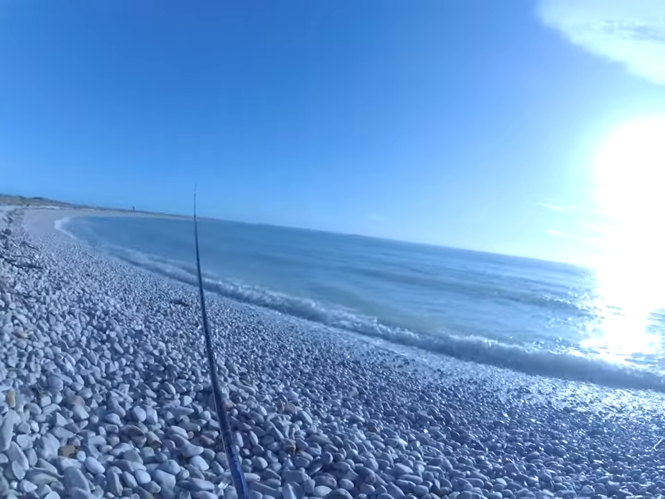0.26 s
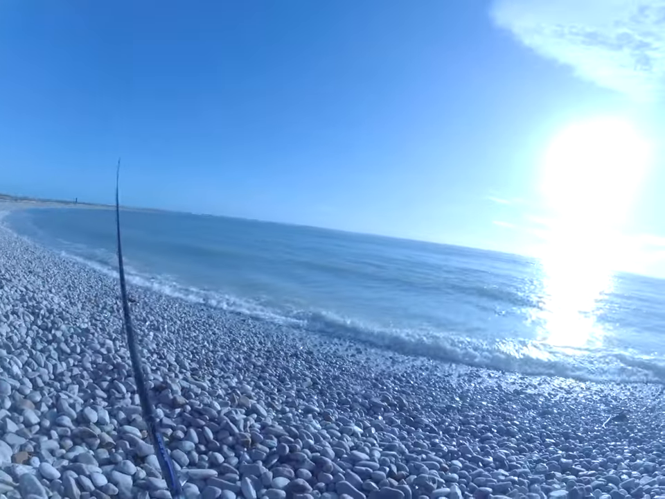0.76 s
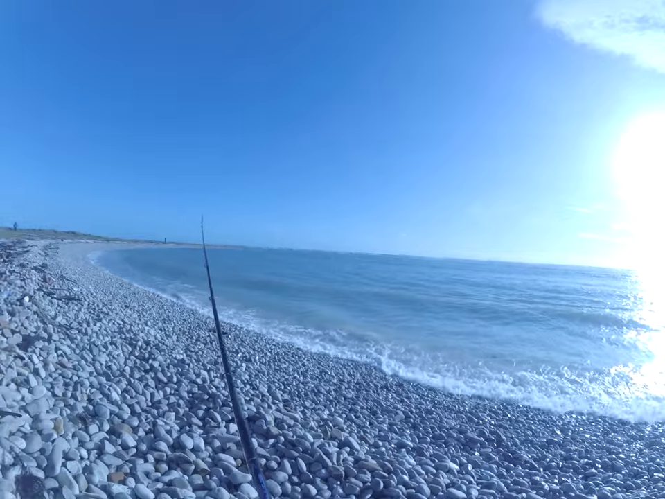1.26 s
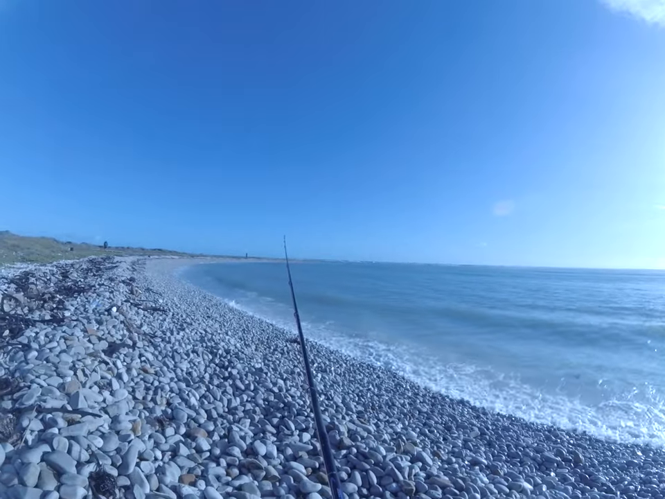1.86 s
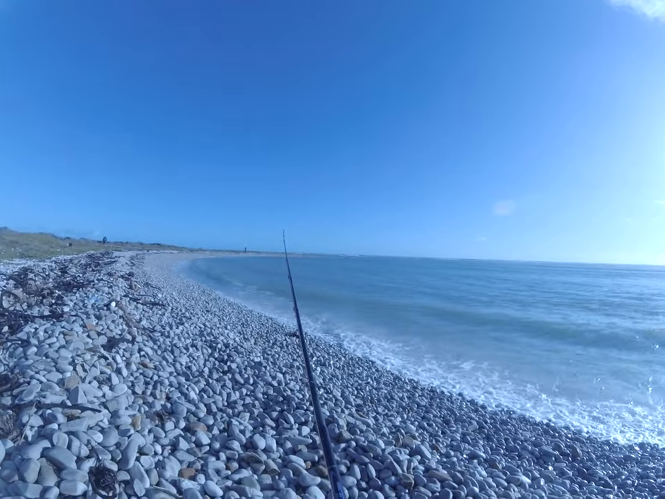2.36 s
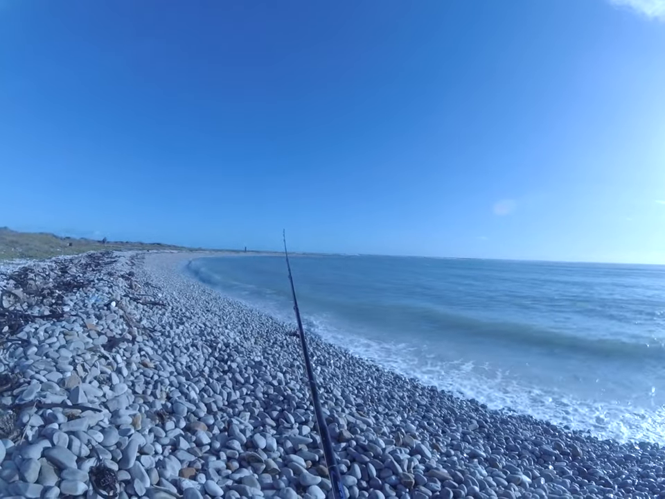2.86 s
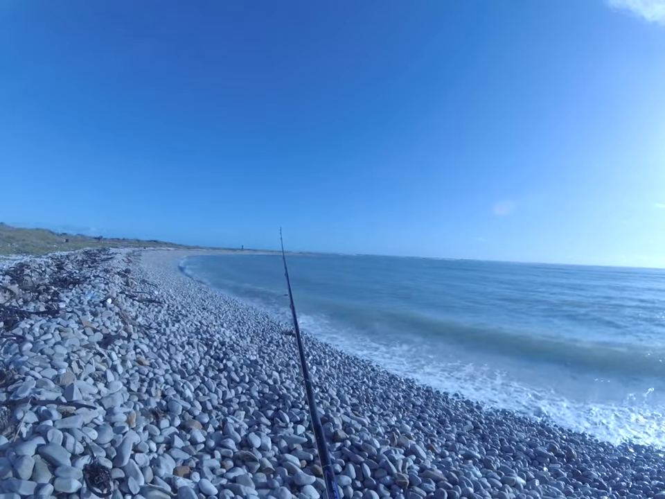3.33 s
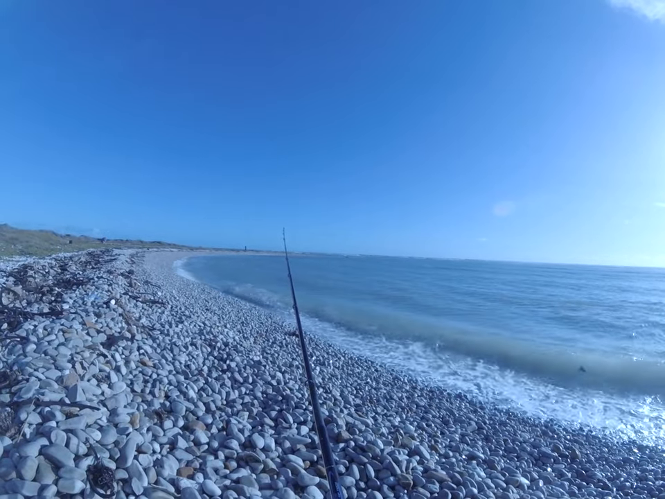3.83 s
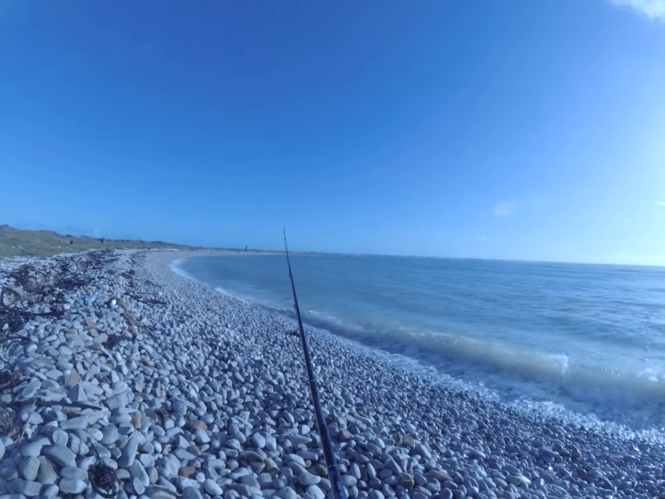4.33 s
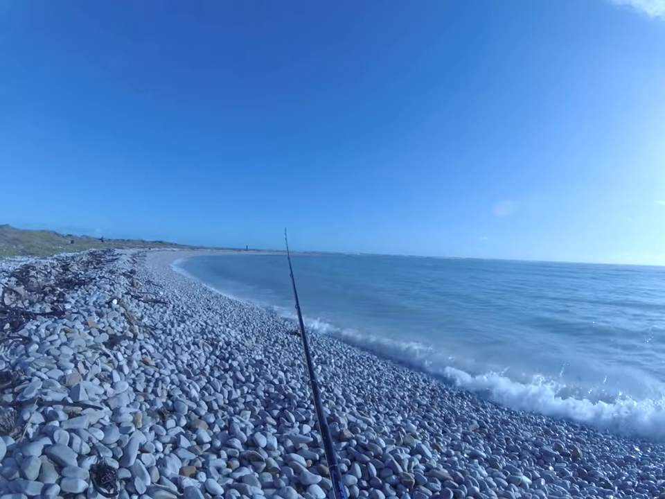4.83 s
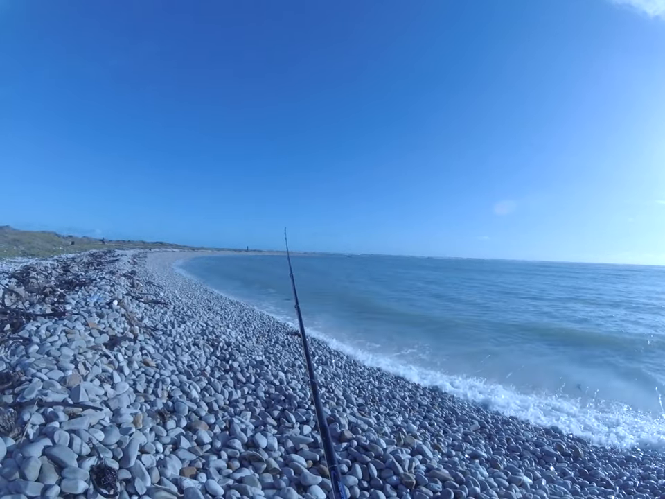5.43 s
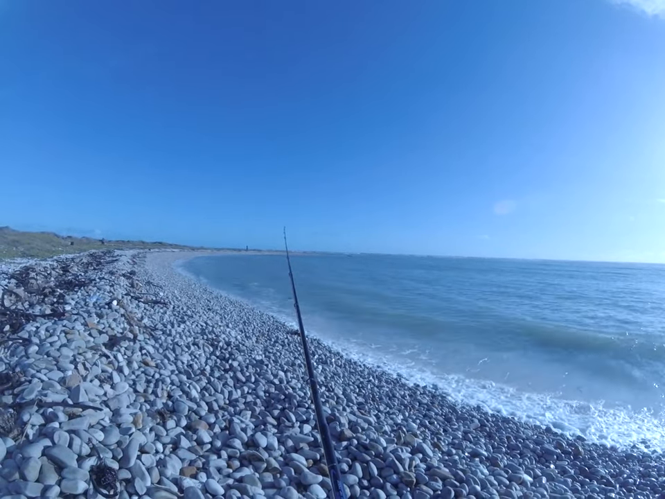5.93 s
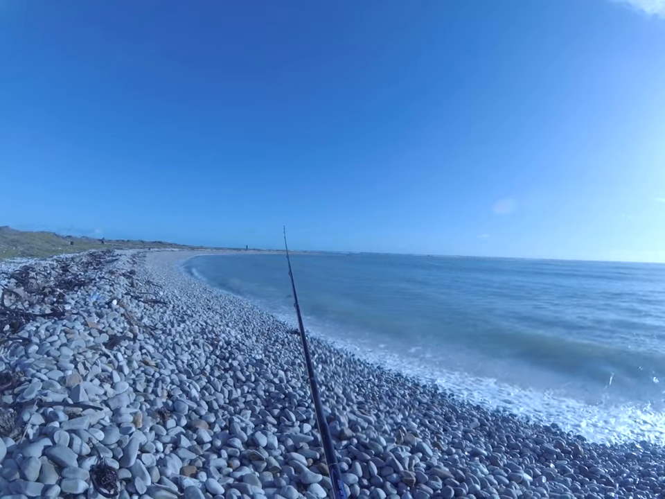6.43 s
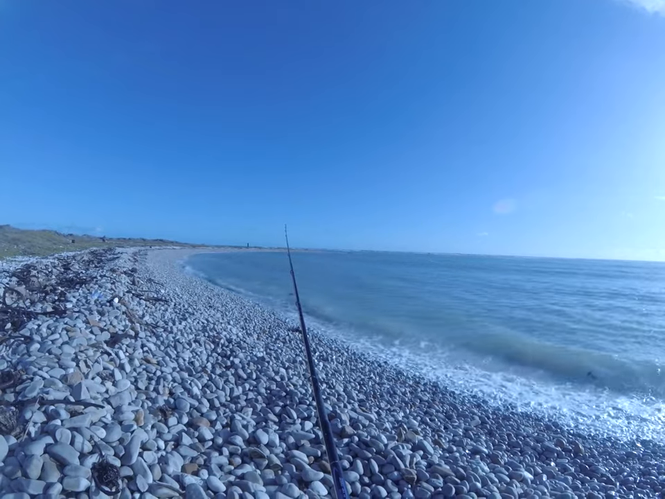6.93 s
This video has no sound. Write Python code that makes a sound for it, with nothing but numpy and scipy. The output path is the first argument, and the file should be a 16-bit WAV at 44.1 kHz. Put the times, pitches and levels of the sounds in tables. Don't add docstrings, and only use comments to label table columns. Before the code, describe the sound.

Gusty wind rumbles over a microphone as two waves wash a stony shore, then backwash clatters the pebbles together close by.

```python
import sys
import numpy as np
from scipy import signal
from scipy.fft import rfft, irfft, dct, next_fast_len
from scipy.io import wavfile
from scipy.ndimage import uniform_filter1d

SR = 44100
rng = np.random.default_rng(int(sys.argv[2]) if len(sys.argv) > 2 else 0)


def output_pcm(signal):
    pcm = np.clip(np.atleast_2d(signal).T, -1, 1) * 32767
    wavfile.write(sys.argv[1], SR, np.round(pcm).astype(np.int16))


def convert_level_to_amplitude(level_db):
    exponent = np.asarray(level_db, float) / 20
    return 10 ** exponent


N = 317079


def rms_one(x):
    return x / np.sqrt(np.mean(x ** 2) + 1e-20)


def both(a_db, b_db):
    return 10 * np.log10(convert_level_to_amplitude(a_db) ** 2 + convert_level_to_amplitude(b_db) ** 2)


def in_time(rows):
    s, *columns = np.transpose(rows)
    return [np.interp(np.arange(N) / SR, s, c) for c in columns]


def bumps(rows):
    t = np.arange(0, N + 32, 32) / SR
    return np.array([np.cos(np.pi / 2 * np.clip((t - row[0]) / row[1], -1, 1)) ** 2 for row in rows])


def fine(coarse):
    return np.interp(np.arange(N) / 32, np.arange(len(coarse)), coarse)


def drift(rate):
    r = np.exp(-80 * np.pi * rate / SR)
    noise = rng.standard_normal(N // 40 + 2002)
    slow = signal.lfilter([1], [1, -2 * r, r * r], noise)[2000:]
    return np.interp(np.arange(N) / 40, np.arange(len(slow)), rms_one(slow))


def ring(clicks, hz, t60):
    r = np.exp(-np.log(1000) / (t60 * SR))
    w = 2 * np.pi * hz / SR
    return signal.lfilter([0, np.sin(w)], [1, -2 * r * np.cos(w), r * r], clicks + 1e-18)


def patchy(source, spectrum, shared_db, own_db, rate, count):
    size = next_fast_len(N)
    hz = np.maximum(np.fft.rfftfreq(size, 1 / SR), 1)
    corner_hz, level_db = np.transpose(spectrum)
    gain_db = np.interp(np.log(hz), np.log(corner_hz), level_db, left=-200, right=-200)
    coloured = rfft(source, size) * convert_level_to_amplitude(gain_db)
    place = np.log(hz / corner_hz[1]) / np.log(corner_hz[-2] / corner_hz[1])
    place = np.clip(place, 0, 1) * (count - 1)
    out = 0
    for k in range(count):
        band = irfft(coloured * np.maximum(1 - abs(place - k), 0), size)[:N]
        out = out + band * convert_level_to_amplitude(shared_db + own_db * drift(rate))
    return rms_one(out)


def evened(x, over_s, depth):
    width = round(over_s * SR)
    level = uniform_filter1d(uniform_filter1d(x ** 2, width), width)
    return rms_one(x / (level + 1e-3) ** (depth / 2))


def hiss():
    # (time [s], level [dB])
    hiss_level = [(0.0, -94), (0.18, -88), (0.75, -75), (1.98, -71.5), (4.48, -67), (4.91, -68.5),
                  (5.25, -66), (6.11, -67.5), (7.19, -66)]
    # (frequency [Hz], density [dB per Hz])
    hiss_colour = [(6760, -34), (11500, -5), (13100, -6), (14000, -10), (14400, -18)]
    noise = patchy(rng.standard_normal(N), hiss_colour, 0, 0, rate=3, count=1)
    return convert_level_to_amplitude(in_time(hiss_level)[0] + 3.0) * noise


def wind():
    # (time [s], level [dB])
    mean_wind = [(0.0, -27.5), (0.2, -31.5), (0.5, -27), (1.24, -33), (1.6, -29), (2.3, -24.5), (2.9, -25),
                 (3.15, -21.5), (3.6, -18), (4.3, -23.5), (4.65, -20.5), (5.0, -27), (5.6, -26.5),
                 (6.0, -29.5), (6.45, -20.5), (6.8, -17), (7.19, -27.5)]
    # (time [s], half length [s], rumble rise [dB], flutter rise [dB])
    gusts = [(0.26, 0.061, -3, 5.5), (0.5, 0.061, -2, 6.5), (0.361, 0.052, 5.5, 9), (0.63, 0.056, 5.5, 3.5),
             (0.982, 0.18, 4, -0.5), (1.43, .04, 13, 3), (1.609, 0.16, 10, 9.5), (1.78, 0.028, 13.5, 2),
             (2.175, 0.055, 5, 1), (2.757, 0.16, -5, -3.5), (2.38, 0.066, 0, 2), (3.045, 0.048, -1.5, 4),
             (3.254, 0.032, 12.5, 6.5), (3.45, 0.033, -9, 4.5), (3.53, 0.024, 3, 3), (3.97, 0.2, 4, 5),
             (4.202, 0.061, -1, 6), (4.408, 0.061, 4.5, 8), (4.559, 0.08, 0, 11), (4.78, 0.072, -1, 6),
             (4.978, 0.053, 11, 10.5), (5.07, 0.059, 4, 11), (5.197, 0.059, 10.5, 12), (5.33, 0.044, 7, 0),
             (5.731, 0.063, 11, 7), (6.167, 0.26, 6.5, 2.5), (6.56, 0.056, 3, 5), (6.7, 0.09, -1, 6),
             (6.938, 0.043, -16, 11.5), (7.124, 0.062, 7.5, 2)]
    # (time [s], half length [s], rumble change [dB], flutter change [dB])
    lulls = [(0.16, 0.09, -3, -4), (0.41, 0.035, -1, -4), (0.7, 0.057, -6, -6), (1.24, 0.087, -2, 1),
             (1.49, 0.043, -9, -8), (1.94, 0.035, 0, -5), (2.3, 0.072, -7, -8), (2.56, 0.029, -3, -13),
             (2.86, .05, -4, 1), (2.96, 0.051, -8, -3), (3.39, 0.026, -3.5, -12), (3.74, 0.051, -17, -6),
             (3.94, 0.034, -12, -25), (4.14, .05, -6, 5.5), (4.5, 0.033, -7, -4), (4.92, 0.048, -5, 4),
             (5.8, 0.046, -1, -5), (5.95, 0.14, -1, 0), (6.33, 0.089, -4.5, -5), (6.75, 0.047, -7, -18)]
    # (frequency [Hz], density [dB per Hz])
    rumble_colour = [(8.8, -52), (15, -7), (48, 2), (65, 4), (90, -5), (120, -11.5), (200, -120)]
    flutter_colour = [(53, -66), (90, 0), (172, -8.5), (240, -13.5), (310, -18.5), (530, -120)]
    # (time [s], peak [dB], pitch [Hz])
    buffets = [(1.413, -12, 83), (1.57, -25, 99.6), (1.763, -42, 72.7), (3.229, 0.5, 77), (3.538, 3, 106),
               (3.683, 1, 90.5), (3.955, -5, 120.1), (4.528, 1.5, 57.7), (4.958, -0.5, 50.4),
               (5.164, 1, 48.6), (5.709, -1, 85.6), (6.515, 1.5, 53.7), (6.65, -0.5, 55.4),
               (6.699, -4.5, 83), (6.759, -1, 106), (6.87, -5, 51.7), (6.933, -1, 148), (7.071, 0, 80)]

    swings = list(gusts) + list(lulls)
    rumble_rise, flutter_rise = np.transpose(swings)[2:] @ bumps(swings)
    mean_db = in_time(mean_wind)[0]
    rumble_db = mean_db + fine(rumble_rise)
    flutter_db = -25.5 + 0.74 * (mean_db + 25) + fine(flutter_rise)
    lumps = drift(28)
    rumble = patchy(rng.standard_normal(N), rumble_colour, 5.3 * lumps, own_db=2.0, rate=7.9, count=2)
    flutter = patchy(rng.standard_normal(N), flutter_colour, 0.72 * lumps, own_db=-1.0, rate=33, count=2)
    out = convert_level_to_amplitude(rumble_db + 2.76) * evened(rumble, 0.049, 0.99)
    out += convert_level_to_amplitude(flutter_db - 1.3) * evened(flutter, 0.054, 0.87)
    for s, peak_db, hz in buffets:
        t = np.arange(round(2.5 * SR / hz)) / SR * hz
        push = convert_level_to_amplitude(peak_db - 3.0) * np.sin(2 * np.pi * t) * (t / 0.72) * np.exp(1 - t / 0.52)
        at = round(s * SR)
        out[at:at + len(t)] += push[:N - at]
    return out


def ticks():
    # (time [s], peak [dB])
    grain_hits = [
        (3.0503, -25),
        (3.056, -33),
        (6.2494, -31),
        (3.326, -35),
        (3.397, -34),
        (6.143, -39),
        (6.213, -35),
        (6.798, -34),
    ]
    clicks = np.zeros(N)
    for s, peak_db in grain_hits:
        clicks[round(s * SR)] = convert_level_to_amplitude(peak_db)
    bright = 1.2 * ring(clicks, 6000, .004) - 1.1 * ring(clicks, 9000, .0015)
    return signal.sosfilt(signal.butter(4, [4600, 11300], "band", fs=SR, output="sos"), bright)


def rattle(level_db):
    # (time [s], rate [clicks per s])
    click_rate = [(6.35, 0), (6.6, 60), (6.8, 450), (7.19, 900)]
    born = rng.random(N) < in_time(click_rate)[0] / SR
    clicks = born * convert_level_to_amplitude(3.5 * np.minimum(rng.exponential(1, N), 3)) * rng.choice([-1, 1], N)
    modes = 0.84 * ring(clicks, 1110, 0.0084) - 0.9 * ring(clicks, 1840, 0.0042)
    return convert_level_to_amplitude(level_db) * (modes + 0.54 * ring(clicks, 3070, 0.0022))


def pebbles():
    # (time [s], peak [dB], ring [Hz], crack [dB])
    knocks = [(5.515, -7.5, 690, -32), (6.435, -30, 1310, -44), (6.486, -16, 830, -34),
              (6.533, -9.5, 1010, -38), (6.56, -9, 910, -31), (6.632, -14, 710, -43), (6.65, -4, 920, -45),
              (6.694, -14, 850, -52), (6.757, -12, 800, -29), (6.774, -7, 900, -34),
              (6.799, -7.5, 850, -21), (6.829, -15, 700, -16), (6.845, -9, 910, -19),
              (6.885, -27, 800, -27), (6.909, -27, 784, -43), (6.923, -31, 506, -17),
              (6.936, -11, 520, -25), (6.982, -10, 1050, -22), (7.027, -7, 1090, -24),
              (7.054, -7, 829, -31), (7.074, -13, 517, -23), (7.121, -5, 850, -15), (7.158, -10, 970, -38),
              (6.506, -20, 1000, -42), (6.637, -11, 970, -32), (6.67, -12, 910, -36),
              (6.701, -16, 1220, -32), (6.818, -16, 690, -36), (6.841, -10, 800, -36),
              (6.871, -18, 1000, -35), (6.911, -17, 1670, -27), (6.962, -18, 890, -32),
              (7.031, -11, 950, -28), (7.059, -17, 790, -26), (7.078, -8, 990, -30), (7.128, -8, 1040, -30),
              (7.17, -13, 910, -32), (3.326, -31, 2900, -34), (3.436, -22, 900, -29),
              (3.52, -17, 1200, -36), (3.617, -22, 2220, -36), (3.876, -15, 990, -32),
              (3.891, -10, 970, -28), (4.089, -15, 1300, -32), (4.224, -12, 1110, -32),
              (6.765, -11, 490, -35), (6.81, -15, 526, -40), (6.833, -9, 540, -40), (6.851, -13, 503, -34)]
    out, t = np.zeros(N), np.arange(round(.08 * SR)) / SR
    chance = rng.standard_normal((len(knocks), len(t)))
    crack_band = signal.butter(1, [600, 2000], "band", fs=SR, output="sos")
    for (s, peak_db, hz, crack_db), noise in zip(knocks, chance):
        body = np.sin(2 * np.pi * hz * t) * np.exp(-t / 0.005)
        body += .5 * np.sin(2 * np.pi * 1.127 * hz * t) * np.exp(-t / 0.0038)
        crack = signal.sosfilt(crack_band, 2.5 * (t == 0) + noise * np.exp(-t / .0035))
        knock = convert_level_to_amplitude(peak_db - 7.5) * body + convert_level_to_amplitude(crack_db + 10.0) * crack
        at = round(s * SR)
        out[at:at + len(t)] += knock[:N - at]
    return signal.sosfilt(signal.butter(4, 3200, fs=SR, output="sos"), out)


def hollow():
    # (time [s], half length [s], level [dB], pitch [Hz])
    tubes = [
        (0.88, 0.097, -36, 800),
        (1.085, 0.081, -27, 424),
        (1.19, .12, -35, 860),
        (1.55, .25, -36.5, 820),
        (4.825, 0.072, -26, 416),
        (5.185, .1, -26, 440),
        (5.38, 0.15, -21, 440),
        (5.46, 0.069, -26, 547),
    ]
    t60 = 0.022
    noise = rng.standard_normal(N)
    out = np.zeros(N)
    for (_, _, level_db, hz), hump in zip(tubes, bumps(tubes)):
        hum = rms_one(ring(ring(noise, hz, t60), hz, t60))
        out += convert_level_to_amplitude(level_db) * fine(hump) * hum
    return out


def bubbles(low_hz, high_hz, per_s, cycles, spread_db, clumps):
    sizes = convert_level_to_amplitude(spread_db * np.minimum(rng.exponential(1, N), 5)) * rng.choice([-1, 1], N)
    born = rng.random(N) < per_s * convert_level_to_amplitude(clumps) / SR
    dealt = rng.integers(0, 11, N)
    out = np.zeros(N)
    for k, hz in enumerate(np.geomspace(low_hz, high_hz, num=11)):
        out += ring(sizes * born * (dealt == k), hz, cycles / hz) * np.sqrt(hz)
    return rms_one(out)


def water(level_db, spectrum, grains, share, surge_db, own_db):
    share = np.clip(share, 0, 1)
    mix = np.sqrt(1 - share ** 2) * rng.standard_normal(N) + share * grains
    coloured = patchy(mix, spectrum, surge_db, own_db, rate=13.0, count=3)
    return convert_level_to_amplitude(level_db) * evened(coloured, 0.044, 0.44)


def slapped(hz):
    # (time [s], half length [s], rise [dB], bubble pitch [Hz])
    slaps = [(0.766, 0.066, 1, 550), (0.817, 0.17, 2.5, 1400), (0.91, 0.024, 5.5, 900),
             (1.135, 0.12, 1.5, 1600), (1.19, 0.19, 2, 800), (3.058, .03, 9, 4000), (1.75, 0.54, 6, 11000),
             (3.403, .1, -4.5, 2200), (3.564, 0.12, -1, 11000), (3.566, 0.068, 2.5, 1800),
             (3.713, 0.061, 2, 3950), (3.837, .05, -3, 3000), (3.895, 0.049, 6, 2000),
             (3.398, .05, 2.5, 7000), (0.148, 0.33, 2, 2500), (4.427, 0.037, 3.5, 350),
             (4.807, 0.15, 4, 11000), (4.795, 0.1, 5, 2540), (4.974, 0.043, 3.5, 500),
             (5.015, 0.018, -5, 400), (5.172, 0.11, 1.5, 400), (5.206, 0.24, 2, 6000),
             (5.368, 0.03, 4.5, 900), (5.42, 0.05, 1.5, 297), (5.555, 0.3, 4.5, 12000),
             (5.724, 0.15, 4.5, 7000), (5.824, 0.029, 3.5, 350), (6.242, 0.038, 3, 4930),
             (3.672, 0.23, 4, 1400), (6.372, 0.06, 2, 1810), (7.076, 0.095, 3, 2500),
             (6.925, .04, -12, 300)]
    _, _, rise_db, pitch = np.transpose(slaps)
    reach_octaves = 1.14
    nearness = np.exp(-(np.log2(pitch / hz) / reach_octaves) ** 2)
    return fine(rise_db * nearness @ bumps(slaps))


def surf_levels():
    # (time [s], level [dB])
    foam_level = [(0.0, -47.5), (0.53, -34.5), (0.84, -30), (1.0, -30.5), (1.2, -28), (1.75, -39.5),
                  (2.31, -43), (3.0, -50), (3.33, -44.5), (3.57, -30.5), (4.1, -29.5), (4.45, -26),
                  (4.8, -26), (5.3, -26), (5.55, -36), (5.9, -44), (6.6, -44), (7.19, -36.5)]
    # (time [s], level [dB])
    tumble_level = [(0.0, -43.5), (0.5, -35.5), (0.8, -30.5), (1.2, -30), (1.75, -30.5), (2.4, -36.5),
                    (3.2, -43.5), (3.48, -39), (3.57, -32), (4.3, -27), (4.8, -22), (5.4, -23.5),
                    (5.6, -26.5), (6.0, -33), (6.45, -36), (7.19, -33.5)]
    # (start [s], rise time [s], roar [dB], splash [dB])
    start, rise, back_roar_db, back_splash_db = (6, 1.3, -29.5, -32)

    t = np.arange(N) / SR
    foam = in_time(foam_level)[0] + 30
    tumble = in_time(tumble_level)[0] + 30
    back_db = 20 * np.log10(np.clip((t - start) / rise, 1e-3, 1) ** 1.2)
    pocket_db = -29 + 0.88 * tumble
    roar_db = both(-29.5 + 0.62 * tumble + 0.14 * foam, back_roar_db + back_db)
    splash_db = both(-33 + 0.13 * tumble + 0.63 * foam, back_splash_db + 1.6 * back_db)
    fizz_db = foam - 30
    spray_db = both(-45 + 1.37 * foam, -56.5) - 21.5 * np.exp(-t / 0.49)
    return (pocket_db + slapped(hz=350), roar_db + slapped(hz=800), splash_db + slapped(hz=2000),
            fizz_db + slapped(hz=6000), spray_db + slapped(hz=9000))


def surf():
    # (frequency [Hz], density [dB per Hz])
    pocket_colour = [(140, 5.5), (240, -1.5), (362, -2), (409, -2.5), (600, -3.5), (780, -29), (1320, -120)]
    roar_colour = [(350, -7.5), (600, -5.5), (855, -5.5), (1400, -11), (1820, -40), (3080, -120)]
    splash_colour = [(820, -36), (1400, -1), (3130, -8.5), (3750, -11.5), (4350, -20.5), (5720, -10),
                     (9680, -120)]
    fizz_colour = [(2590, -5.5), (4350, -10), (4800, -5), (5190, -0.5), (6100, 2), (6650, -1.5),
                   (7300, -10), (8500, -17.5), (11000, -42), (18700, -120)]
    spray_colour = [(5000, -17.5), (8500, -0.5), (10900, -9.5), (11500, -15.5), (15000, -61), (22000, -120)]

    surge = 0.33 * drift(7.6) + 0.76 * drift(30)
    pocket_db, roar_db, splash_db, fizz_db, spray_db = surf_levels()
    pockets = bubbles(264.0, 542, per_s=300, cycles=6.9, spread_db=1.5, clumps=.5 * surge)
    roar = bubbles(637, 1276, per_s=900, cycles=9.9, spread_db=1.0, clumps=0.73 * surge)
    splash = bubbles(1640, 3230, per_s=2500, cycles=7.9, spread_db=0.5, clumps=0.84 * surge)
    fizz = bubbles(3600, 11500, per_s=8000, cycles=5.5, spread_db=2.5, clumps=0.92 * surge)
    return (water(pocket_db, pocket_colour, pockets, 0.3, 0.12 * surge, own_db=-0.3)
            + water(roar_db - .4, roar_colour, roar, 0.22, 0.17 * surge, own_db=0.7)
            + water(splash_db - .3, splash_colour, splash, 0.41, 0.41 * surge, own_db=0.25)
            + water(fizz_db, fizz_colour, fizz, 0.54, 0.31 * surge, own_db=0.55)
            + water(spray_db, spray_colour, fizz, .35, .6 * surge, own_db=.8))


def scene():
    mono = wind() + surf() + hollow() + pebbles() + rattle(level_db=-30.5) + ticks()
    return np.tile(mono, (2, 1))


def split():
    # (time [s], length [s], level [dB], low edge [Hz], high edge [Hz])
    s, length, level_db, low_hz, high_hz = (4.506, .04, -30.5, 5120, 6330)
    t = np.clip((np.arange(N) / SR - s) / length + .5, 0, 1)
    burst = rfft(rng.standard_normal(N) * np.sin(np.pi * t))
    hz = np.fft.rfftfreq(N, 1 / SR)
    band = irfft(burst * (hz > low_hz) * (hz < high_hz), N)
    return convert_level_to_amplitude(level_db) * band / np.sqrt(2 * (high_hz - low_hz) / SR) * np.array([[1], [-1]])


def coarse_treble(x, masking_db, waver_db):
    # (frequency [Hz], level over step [dB])
    step_fineness = [(5500, 22), (7000, 9), (8300, 1), (9300, -6), (11000, -8.5), (12500, -7),
                     (14000, -7.5), (14450, -10)]
    hop, lead = 1024, 2048 - 53
    window = signal.windows.kaiser_bessel_derived(2 * hop, 4 * np.pi)
    blocks = np.pad(x, (lead, 2 * hop + (-N - lead) % hop), mode="reflect").reshape(-1, hop)
    a, b, c, d = np.split(np.hstack([blocks[:-1], blocks[1:]]) * window, 4, axis=1)
    lines = dct(np.hstack([-c[:, ::-1] - d, a - b[:, ::-1]]), type=4, norm="ortho")
    hz = (np.arange(hop) + .5) * SR / (2 * hop)
    power = uniform_filter1d(uniform_filter1d(lines ** 2, size=32, axis=1), size=5, axis=0)
    level = np.sqrt(power + 1e-20)
    picks = rms_one(uniform_filter1d(rng.standard_normal((len(lines), 128)), size=3, axis=0))
    waver = np.repeat(picks, 8, axis=1)
    step = level * convert_level_to_amplitude(waver_db * waver - np.interp(hz, *np.transpose(step_fineness), left=60))
    port = level[:, (hz > 5000) & (hz < 7000)].mean(axis=1, keepdims=True)
    step = np.maximum(step, port * convert_level_to_amplitude(masking_db + waver_db * waver) * (hz > 11400))
    lines = np.sign(lines) * np.floor(abs(lines) / step + .4) * step * (hz < 14470)
    p, q = np.split(dct(lines, type=4, norm="ortho"), 2, axis=1)
    frames = np.hstack([q, -q[:, ::-1], -p[:, ::-1], -p]) * window
    out = frames[:, :hop] + np.vstack([np.zeros(hop), frames[:-1, hop:]])
    return out.ravel()[lead:lead + N]


def roll_off(x):
    return signal.sosfilt(signal.butter(12, 14980, fs=SR, output="sos"), x)


def record(dry):
    ported = dry[0] + .6 * signal.lfilter(*signal.iirpeak(6500, 22, fs=SR), dry[0])
    sound_top = signal.cheby1(8, .5, 11500, fs=SR, output="sos")
    amplified = signal.sosfilt(sound_top, 0.98 * np.tanh(ported / 1.035)) + hiss()
    mono = coarse_treble(amplified, masking_db=-32, waver_db=3.5)
    return roll_off(mono + split())


dry = scene()
out = record(dry)
output_pcm(out)
```